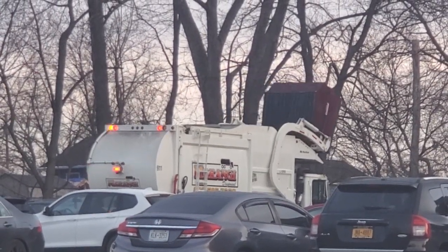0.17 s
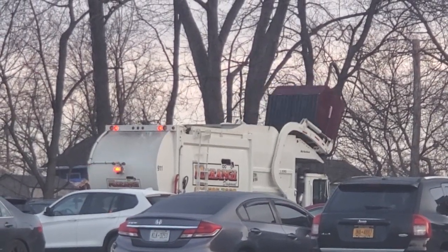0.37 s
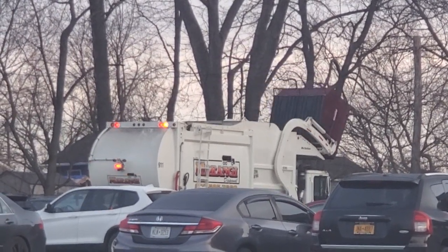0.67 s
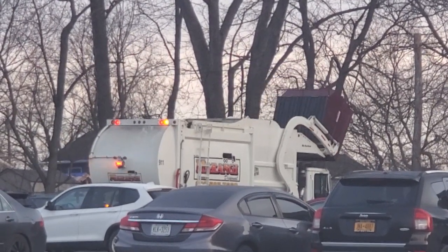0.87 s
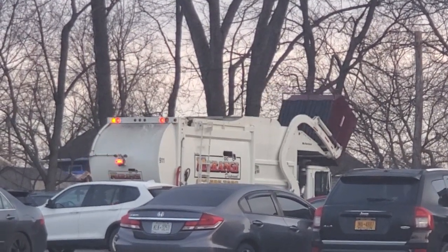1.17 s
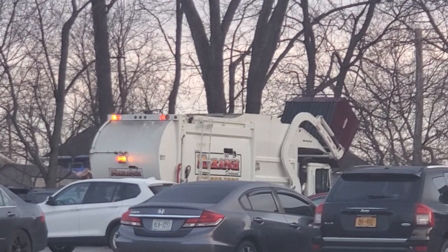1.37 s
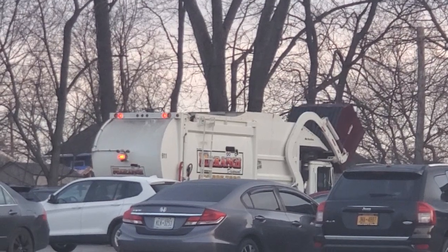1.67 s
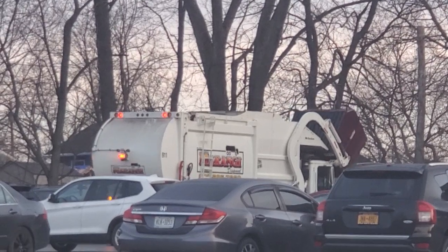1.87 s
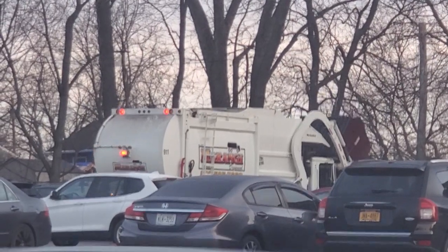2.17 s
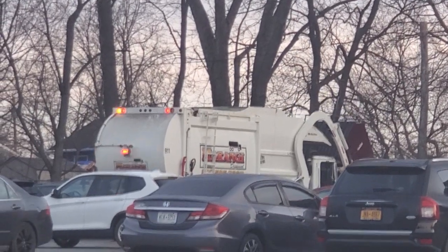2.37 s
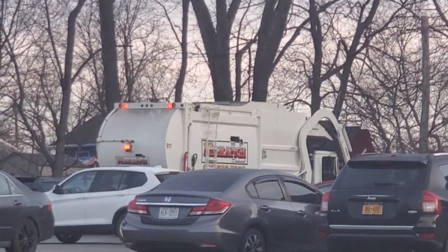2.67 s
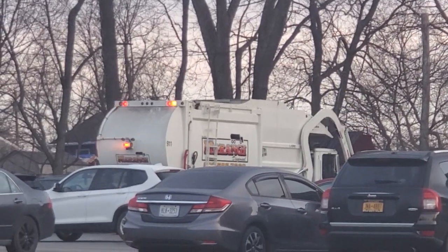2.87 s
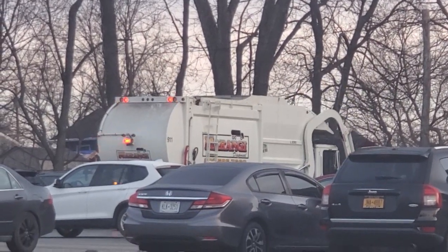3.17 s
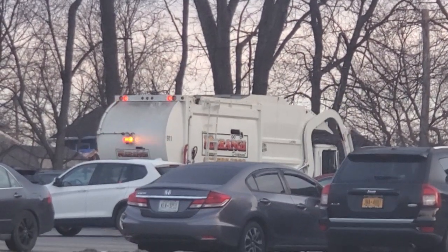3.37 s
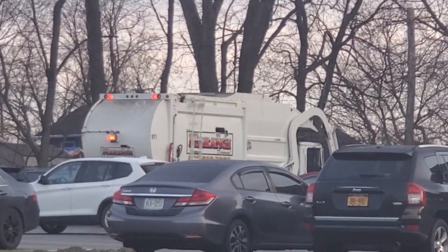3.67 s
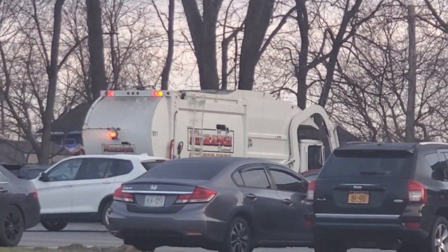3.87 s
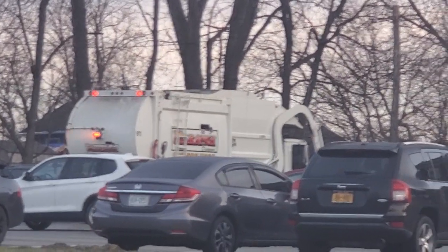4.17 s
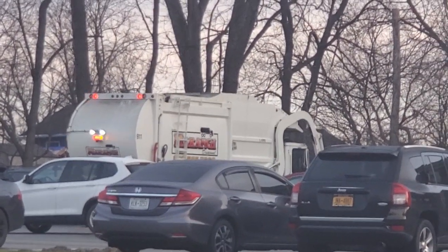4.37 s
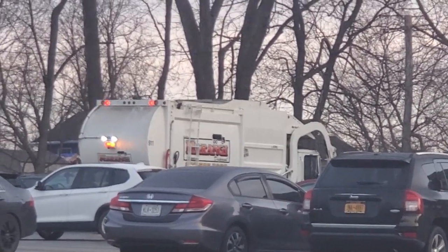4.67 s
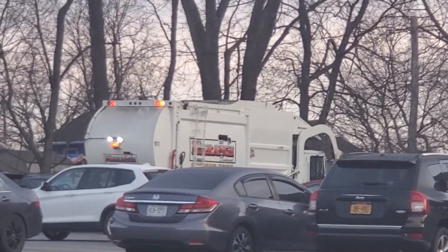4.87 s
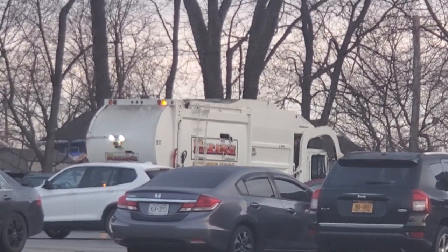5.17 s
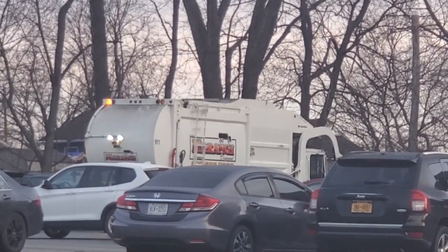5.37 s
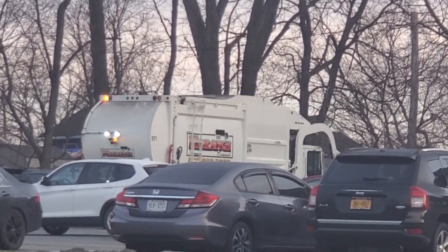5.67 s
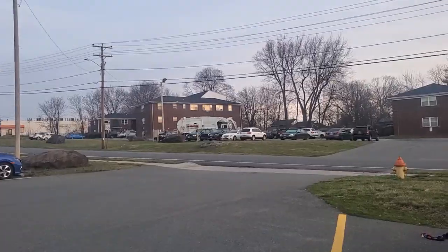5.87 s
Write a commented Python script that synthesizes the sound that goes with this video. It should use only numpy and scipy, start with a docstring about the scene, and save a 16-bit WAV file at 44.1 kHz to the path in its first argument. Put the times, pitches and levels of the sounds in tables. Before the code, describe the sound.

A diesel vehicle speeds past from right to left, then a garbage truck bangs a steel dumpster down, echoing off buildings.

```python
"""A diesel vehicle speeds past from right to left, changes gear and pulls away. Across a car park a refuse
truck bangs a steel container down, and buildings echo the blows. The engine's firings make a hum and
set its noises throbbing; the steel rings when struck and scrapes as it slides. Light wind brushes two
hand-held microphones, with the truck's pump and a distant road underneath."""
import sys
import numpy as np
from scipy import signal
from scipy.fft import rfft, irfft, next_fast_len
from scipy.io import wavfile
from scipy.ndimage import uniform_filter1d, map_coordinates

SR = 44100
rng = np.random.default_rng(int(sys.argv[2]) if len(sys.argv) > 2 else 0)


def transcribe(u):
    """Save the signal u as a 16-bit wav file named by the first command-line argument.

    u: samples, shape (n,) or (channels, n), limited to [-1, 1]; the rate is SR.
    q: integer samples, one column per channel.
    """
    v = np.clip(np.atleast_2d(u).T, -1, 1)
    q = np.round(v * 32767).astype(np.int16)
    wavfile.write(sys.argv[1], SR, q)


N = 265393
T = np.arange(N) / SR
PASSES_S, ALONGSIDE_S = 2.155, 0.42  # moment the vehicle is closest; its distance then over its speed
SCATTER = .13  # share of the tyre noise that bounces off cars and walls on its way

# clatter, rasp and turbo going by: peak t/s, level/dB, time alongside/s, fade before and after/(dB/s)
PART_PEAKS = {"clatter": (2.0, -55, 0.82, 16.5, 10.5), "rasp": (1.87, -62.5, 0.8, 37, 31),
              "turbo": (1.67, -68.5, .5, 57, 15.5)}
# loudness through the drive: t/s, tyre level/dB, tailpipe hiss level/dB
DRIVE_LEVELS = [(0, -53, -97), (.4, -50.5, -96), (1.05, -45.5, -88.5), (1.4, -43, -69.5), (1.72, -40, -61),
                (1.95, -41.5, -55), (2.3, -41.5, -55), (2.62, -43, -63.5), (2.85, -49, -72),
                (3.32, -54.5, -84.5), (3.6, -59.5, -95), (3.9, -58.5, -92), (4.25, -66, -95),
                (6.02, -70, -92)]
# tone of a high hiss: f/Hz, level/dB
HISS_TONE = [(7300, -32), (7900, -9.5), (8800, -7), (9700, -3.5), (11500, -6.5), (12300, -11.5),
             (15700, -10.5)]


def vehicle():
    """The engine's firings drive the exhaust note and make the other noises throb as it goes by."""
    engine = [(0, 46.53, -48), (.33, 51.23, -45.5), (.55, 52.57, -51.5), (.85, 54.47, -47.5),
              (1.0, 58.06, -42), (1.28, 64.33, -37), (1.5, 73.27, -34.5), (1.58, 73.82, -34),
              (1.88, 73.18, -30.5), (2.0, 73.35, -29), (2.24, 76.32, -30), (2.56, 74.35, -34),
              (2.82, 68.7, -34.5), (3.23, 64.16, -41), (3.4, 59.74, -40.5), (3.5, 55.22, -45.5),
              (3.62, 52.98, -47.5), (3.8, 51.93, -45.5), (4.43, 50.97, -48), (4.6, 58.9, -44),
              (4.71, 63.7, -39.5), (4.97, 67.5, -43.5), (5.6, 66.84, -47.5), (6.02, 63.4, -41)]  # t/s, firing rate/Hz, exhaust level/dB
    hz, level_db = curves(engine)
    phase = 2 * np.pi * np.cumsum(hz * (1 + 0.0058 * wander(25.03))) / SR
    throb = np.cos(phase)
    note = exhaust(hz, level_db, phase)
    noise = exhaust_gas(level_db, throb) + tyres(throb) + engine_rattle(throb)
    body = at_mics(note + noise[0]) + noise[1:]
    hiss = tailpipe_hiss(throb)
    treble = at_mics(hiss[0] + turbo()) + hiss[1:]
    lean_db = -4.0 * np.minimum(lag_ms(), 0)  # once past, all but the bass is louder on the left
    pan_db = -3.5 - 19 * lag_ms()  # hand and body shield the far microphone from the highest sounds
    return lean_left(body, lean_db) + treble * undb(np.array([pan_db, -pan_db]) / 2)


def exhaust(hz, level_db, phase):
    """Firings make harmonics (tones at multiples of their rate), which the pipe boosts or weakens."""
    # main harmonics: multiple, level/dB, share of the distance loss before and after passing
    harmonics = [(1, -1, 0.79, 0.34), (2, 0.5, 0.15, 0.014), (3, -2, 0.53, 0.075), (4, -14, -0.22, .4),
                 (5, -12, 0.36, 1), (6, -15, 0.26, .9), (7, -12.5, 1.17, 1.3)]
    upper = [(8, -6.5), (9, -12.5), (10, -26.5), (11, -17), (12, -17.5), (13, -15.5), (14, -13)]  # high harmonics: multiple, level/dB against the 7th
    halves = [(.5, -32), (1.5, -15), (2.5, -18.5), (3.5, -19)]  # in-between tones: multiple, level/dB against the 2nd
    pipe = [(45, 14), (60, -9.5), (68, -17), (73, -2.5), (110, 1.5), (150, 0), (188, -7), (203, -0.5),
            (220, 0), (260, 2), (300, -2.5), (380, -0.5), (520, 0)]  # the pipe's effect: f/Hz, gain/dB
    dips = [(0.45, 2, -15, 0.11), (1.65, 2, -13.5, 0.4), (2.4, 6, 1.5, .2), (1.98, 3, -21, .16),
            (1.82, 5, -15, 0.31), (2.033, 4, -10, 0.074), (2.42, 3, -8.5, 0.17), (2.42, 1, -7, .08),
            (2.58, 1, 2.5, .15), (1.404, 4, 6.5, 0.25), (2.278, 4, -6, 0.21), (2.7, 4, -22, 0.3),
            (2.42, 5, -9, .1), (4.13, 2, -12, 0.082), (.65, 3, 8, 0.68), (4.9, 2, -5, 0.061),
            (4.15, 4, 12, .1), (4.48, 2, 6.5, 0.073), (5.4, 2, -4, .3), (3.735, 3, -6, 0.46),
            (1.572, 7, -12, 0.12), (2.2, 7, -5, 0.12)]  # brief dips and swells: t/s, multiple, change/dB, length/s
    pipe_hz, pipe_db = np.transpose(pipe)
    levels = {}
    for k, db, before, after in harmonics:
        db = db + level_db + np.interp(np.log(k * hz), np.log(pipe_hz), pipe_db)
        share = np.where(T < PASSES_S, before, after) + 0.14 * wander(9) ** 2  # less steady far away
        change_db = sum(depth * bump(s, length, 4) for s, which, depth, length in dips if which == k)
        levels[k] = db - share * distance_loss(PASSES_S, ALONGSIDE_S) + change_db
    levels.update({k: levels[7] + db + 2.6 * wander(11) for k, db in upper})
    levels.update({k: levels[2] + db + 0.74 * wander(4.2) for k, db in halves})
    note = 0
    for k, db in levels.items():
        gain = np.sqrt(2) * undb(db + 0.8 * wander(26.09))
        # the high harmonics line up into one sharp pop per firing
        note += gain * np.cos(k * phase + 2.9 / k + .5 * rng.standard_normal())
    wall_s, wall_db = .3, -16  # late echo from a building
    return note + undb(wall_db) * np.pad(note, (int(wall_s * SR), 0))[:N]


def exhaust_gas(level_db, throb):
    """Rushing gas booms and roars, rising and falling with the exhaust level."""
    boom = [(25, -32), (45, -11), (80, -4), (160, -3), (260, -4.5), (340, -20)]  # low rumble: f/Hz, level/dB
    roar = [(220, -19.5), (320, -6.5), (420, -1), (520, 0), (680, 1), (800, -9), (1000, -14.5)]  # mid-pitched rush: f/Hz, level/dB
    effort_db = level_db + 30  # about zero as the vehicle passes
    boom_db = -38.5 + 0.77 * effort_db + 0.8 * wander(7.5)
    ahead_db = 1.5 * np.tanh((PASSES_S - T) / ALONGSIDE_S)  # the roar is thrown forward
    roar_db = -41.5 + 0.99 * effort_db + ahead_db + 0.52 * throb + 0.25 * wander(26)
    return spread(boom, undb(boom_db), scattered=.03) + spread(roar, undb(roar_db), SCATTER / 2)


def tyres(throb):
    """Tyres rush over the road, loudest near the pass."""
    tone = [(600, -24.5), (800, -8), (1000, -3.5), (1250, -8.5), (1500, -7.5), (1900, -11.5), (2400, -17),
            (3200, -28.5)]  # f/Hz, level/dB
    db, _ = curves(DRIVE_LEVELS)
    return spread(tone, undb(db + 0.78 * throb + 1.1 * wander(15)), SCATTER)


def engine_rattle(throb):
    """The diesel's clatter and a higher rasp pulse with the firings."""
    clatter = [(2000, -20.5), (2700, -1), (3700, -6), (4500, -13), (6000, -33), (7500, -40.5)]  # f/Hz, level/dB
    rasp = [(3800, -5), (4800, 0), (6200, -1), (7200, -5), (7800, -31)]  # f/Hz, level/dB
    clatter_db = passing_db(*PART_PEAKS["clatter"]) + 0.49 * throb + 1.6 * wander(29.86)
    rasp_db = passing_db(*PART_PEAKS["rasp"]) + 1.2 * throb + 1.7 * wander(27)
    return spread(clatter, undb(clatter_db), 3.9 * SCATTER) + spread(rasp, undb(rasp_db), scattered=.6)


def tailpipe_hiss(throb):
    """The tailpipe hisses harder at each firing."""
    _, db = curves(DRIVE_LEVELS)
    return spread(HISS_TONE, undb(db + 2.66 * throb + 0.36 * wander(13)), scattered=0.73)


def turbo():
    """The turbocharger whistles in a thin, high band of noise."""
    tone = [(8700, -30.5), (9300, -0.5), (9700, 0), (10300, -32.5)]  # f/Hz, level/dB
    return undb(passing_db(*PART_PEAKS["turbo"]) + 1.6 * wander(28)) * shaped_noise(tone)


def container_blows():
    """Each blow makes the steel box ring and its sheet walls crash."""
    blows = [(4.552, -37, -3.5, -1), (5.262, -32.5, -17, 2.5), (5.37, -30, -8, -1), (5.54, -24.5, 0, -7),
             (5.659, -35.5, -9, 3.5), (5.76, -32.5, -7.5, 1), (5.971, -38, -29, -1)]  # t/s, level/dB, treble tilt/(dB/kHz), bass lift/dB
    notes = [(58, -7, 0.26), (78, 10.5, 0.46), (98.4, 10, 0.57), (163, -11, .2), (204, 1.5, 0.15),
             (262, 2, 0.26), (399.4, -6, 0.2), (494, -19.5, 0.19), (587.4, -20.5, 0.11)]  # the box's own notes: f/Hz, level/dB, fade time/s (to fall 60 dB)
    clang = [(18, -35), (30, 3.5), (159, 2.5), (198, 4.5), (234, -6), (592, -19.5), (717, -30.5),
             (1000, -19), (1210, -29), (4400, -54.5), (9000, -80.5), (11700, -101), (19800, -120)]  # crash of sheet steel: f/Hz, level/dB
    bass_hz = 120
    t = np.arange(SR) / SR
    out = np.zeros(N + SR)
    for s, db, tilt_db, bass_db in blows:
        ring = 0
        for hz, note_db, fade_s in notes:
            gain = undb(note_db + bass_db * (hz < bass_hz) + rng.standard_normal())
            pitch = hz * (1 + 0.0057 * rng.standard_normal())
            ring += gain * np.sin(2 * np.pi * pitch * t) * 1000 ** (-t / fade_s)
        tone = [(hz, g + tilt_db * min(hz / 1000, 3) + bass_db * (hz < bass_hz)) for hz, g in clang]
        crash = shaped_noise(tone, SR) * (1000 ** (-t / .5) + 0.41 * np.exp(-t / 0.025))
        start = int(s * SR)
        out[start:start + SR] += undb(db) * (0.24 * ring + 0.67 * crash) * np.minimum(t / .002, 1)
    return out[:N]


def building_echo(sound):
    """Building fronts throw back a smeared echo that swells and dies away."""
    arrival_s, smear_s, fade_s, echo_db = 0.11, 0.094, 0.7, 4
    t = np.arange(SR) / SR
    rise = 1 / (1 + np.exp((arrival_s - t) / (smear_s / 2)))
    echo = rng.standard_normal((2, SR)) * rise * 1000 ** (-t / fade_s)
    low = signal.sosfilt(signal.butter(2, 2500, fs=SR, output="sos"), echo)
    echo = echo - low + low[0]  # long waves reach both microphones alike
    echo = cut_bass(echo, 150)  # small fronts reflect little bass
    echo *= undb(echo_db) / np.sqrt(np.sum(echo[0] ** 2))
    return signal.fftconvolve(sound[None], echo, axes=1)[:, :N]


def steel_scrapes():
    """Steel slips and catches on steel: a scrape with a bright sizzle that dies sooner."""
    # slides: t/s, hold/s, scrape level/dB, sizzle level/dB, scrape fade/(dB/s), sizzle rise/s
    slides = [(.08, 0.15, -56.5, -105, 300, 0.036), (4.532, 0.14, -57, -77, 69, .06),
              (5.269, .06, -57.5, -83, 90, .05), (5.341, 0.14, -55.5, -79, 91, .08),
              (5.532, 0.017, -44.5, -67, 250, 0.028), (5.571, 0.14, -49.5, -61.5, 43, 0.031)]
    scrape_tone = [(350, -20), (600, -11), (950, 4.5), (1250, -1.5), (1600, 0.5), (2200, -10.5),
                   (3500, -18.5), (5000, -32.5), (7000, -53.5)]  # f/Hz, level/dB
    sizzle_tone = [(2800, -16.5), (3800, 1), (5000, -3), (6500, -15), (7500, -33), (9500, -23),
                   (12000, -32)]  # f/Hz, level/dB
    bite_s = 0.011  # rise of the scrape
    scrape = sizzle = 0
    for s, hold, scrape_db, sizzle_db, fade, rise in slides:
        faded_db = fade * np.maximum(T - s - bite_s - hold, 0)
        scrape += undb(scrape_db - faded_db) * np.clip((T - s) / bite_s, 0, 1) ** 2
        sizzle += undb(sizzle_db - 1.7 * faded_db) * np.clip((T - s) / rise, 0, 1) ** 2
    catching = undb(1.5 * wander(60))
    body = spread(scrape_tone, scrape * catching, scattered=0.4)
    return body[0] + body[1:] + sizzle * catching * shaped_noise(sizzle_tone, (2, N))


def steel_squeaks():
    """The steel gives short, rough squeaks."""
    squeaks = [(5.29, 3000, -63, .03), (3.3, 3500, -72, 0.087), (0.194, 2600, -61, 0.096)]  # t/s, f/Hz, level/dB, length/s
    return sum(undb(db) * wander(320) * np.sin(2 * np.pi * hz * T) * bump(s, length)
               for s, hz, db, length in squeaks)


def finger_knock():
    """A finger knocks once beside the right microphone: a snap, a thud and a tiny ping."""
    knock_s, knock_db = 4.3038, -22.5
    t = np.maximum(T - knock_s, 0)
    snap = bump(knock_s + .0002, 2 * 0.00026)
    thud = 0.64 * 1.24 * np.sin(2 * np.pi * 210 * t) * (t / 0.0025) * np.exp(-t / 0.0029)
    left = undb(-8) * np.sin(-2 * np.pi * 640 * t) * (t / 0.001) * np.exp(1 - t / 0.00089)
    ping = undb(-24.5) * np.sin(2 * np.pi * 4300 * t) * np.exp(-t / 0.00035)
    return undb(knock_db) * np.array([left + .6 * ping, snap - thud + ping])


def wind():
    """Wind rumbles on each microphone separately, and gusts thump on both."""
    gusts = [(0.05, -36, 2), (0.324, -34, 0), (0.416, -32, -18), (4.032, -43, -14), (4.12, -33.5, -1)]  # t/s, level/dB, left minus right/dB
    rumble = [(15, 3.5), (35, 8.5), (70, -0.5), (150, -16.5), (300, -40.5)]  # f/Hz, level/dB
    out = undb(-56 + 6.2 * wander(5)) * shaped_noise(rumble, (2, N))
    thump_hz = 85 * np.array([[1.2], [1]])  # left, right
    for s, db, pan_db in gusts:
        thump = bump(s, 2 * 0.006) * np.sin(2 * np.pi * thump_hz * (T - s))
        out += undb(db + np.array([[pan_db], [-pan_db]]) / 2) * thump
    return out


def truck_pump():
    """The truck's hydraulic pump drones, and grows louder as it labours."""
    tone = [(430, -21), (560, 0.5), (650, -2), (730, -3.5), (850, -20)]  # f/Hz, level/dB
    load_s = 2.6
    return undb(-64 + 3 * np.tanh(T - load_s) + 1.4 * wander(6.9)) * shaped_noise(tone)


def distant_road():
    """Far traffic murmurs, its bass alike at both microphones."""
    tone = [(18, -40.5), (30, -13), (86, 7), (165, -4.5), (371, -11.5), (642, -19), (880, -17),
            (1080, -18.5), (1830, -25.5), (2780, -50.5), (3710, -37), (4700, -66), (15700, -50)]  # f/Hz, level/dB
    common, difference = shaped_noise(tone, (2, N))
    difference = cut_bass(difference, 300)
    return undb(-51.5 + 1.5 * wander(3)) * np.array([common + difference, common - difference])


def faint_hiss():
    """Two faint, high puffs sound over the microphones' own hiss."""
    puffs = [(0.814, -69.5, 0.0085), (3.92, -78, 0.072)]  # t/s, level/dB, length/s
    gain = sum(undb(db) * bump(s, length) for s, db, length in puffs)
    return gain * shaped_noise(HISS_TONE, (2, N)) + undb(-85) * rng.standard_normal((2, N))


def distance_loss(s, alongside):
    """Decibels lost as sound spreads out from something that is closest at time s."""
    return 10 * np.log10(1 + ((T - s) / alongside) ** 2)


def passing_db(s, db, alongside, before, after):
    """Level of a passing part: distance, air and shielding all take more the farther off it is."""
    extra_path = np.hypot(T - s, alongside) - alongside
    return db - distance_loss(s, alongside) - extra_path * np.where(T < s, before, after)


def lag_ms():
    """How much later the left microphone hears the vehicle; negative when it is off to the left."""
    along = (PASSES_S - T) / ALONGSIDE_S
    return 0.1 + 0.43 * along / np.hypot(along, 1)


def at_mics(x):
    """The vehicle's direct sound reaches the nearer microphone first."""
    half_lag = lag_ms() * SR / 2000
    return np.array([map_coordinates(x, [np.arange(N) + side * half_lag], order=3, mode="nearest")
                     for side in (-1, 1)])


def spread(tone, gain, scattered):
    """Noise in three rows: direct, then the share scattered by cars and walls to the left and right."""
    return np.sqrt([[1 - scattered], [scattered], [scattered]]) * shaped_noise(tone, (3, N)) * gain


def lean_left(pair, db):
    """Shift all but the bass to the left."""
    low = signal.sosfiltfilt(signal.butter(1, 400, fs=SR, output="sos"), pair)
    return low + (pair - low) * undb([db, -db])


def shaped_noise(tone, shape=N):
    """Noise of average power 1 whose tone follows (f/Hz, level/dB) points."""
    noise = rng.standard_normal(shape)
    size = next_fast_len(noise.shape[-1])
    hz, db = np.transpose(tone)
    log_hz = np.log(np.arange(size // 2 + 1) * SR / size + 1)
    gain = undb(np.interp(log_hz, np.log(hz), db, -120, -120))
    return irfft(rfft(noise, size) * gain / np.sqrt(np.mean(gain ** 2)), size)[..., :noise.shape[-1]]


def wander(rate):
    """A smooth random wobble of size about 1, with `rate` new values a second."""
    hold = int(SR / rate)
    steps = np.repeat(rng.standard_normal(N // hold + 1), hold)
    return 1.234 * uniform_filter1d(uniform_filter1d(steps, hold), hold)[:N]


def bump(s, length, steepness=2):
    """A smooth rise and fall centred on time s."""
    return np.exp(-((T - s) / (length / 2)) ** steepness)


def curves(table):
    """Join a table's timed points with straight lines, one curve per column."""
    s, *columns = np.transpose(table)
    return [np.interp(T, s, column) for column in columns]


def cut_bass(x, hz, order=1):
    """Weaken everything below hz."""
    return signal.sosfilt(signal.butter(order, hz, "high", fs=SR, output="sos"), x)


def undb(db):
    """Turn decibels into a gain."""
    return 10 ** (np.asarray(db) / 20)


def scene():
    """Add up all the sounds, left and right."""
    diesel, blows = vehicle(), container_blows()
    container = blows + building_echo(blows) + steel_scrapes() + steel_squeaks()
    return diesel + container + finger_knock() + wind() + truck_pump() + distant_road() + faint_hiss()


def record(dry):
    """The microphones drop the deepest bass, and the highest treble is cut off."""
    bottom_hz, top_hz = 38, 15750
    dry = cut_bass(dry, bottom_hz, order=4)
    return signal.sosfilt(signal.ellip(10, .2, 80, top_hz, fs=SR, output="sos"), dry)


dry = scene()
out = record(dry)
transcribe(out)
```